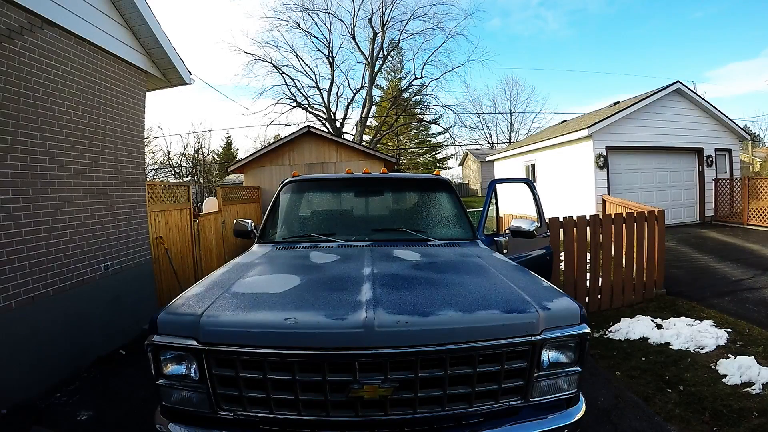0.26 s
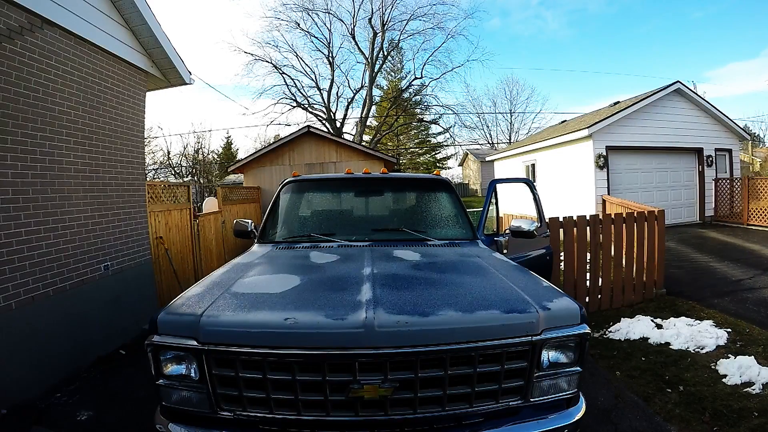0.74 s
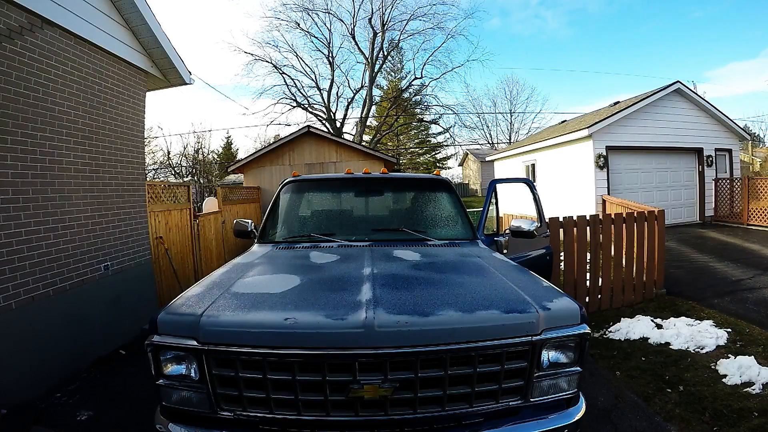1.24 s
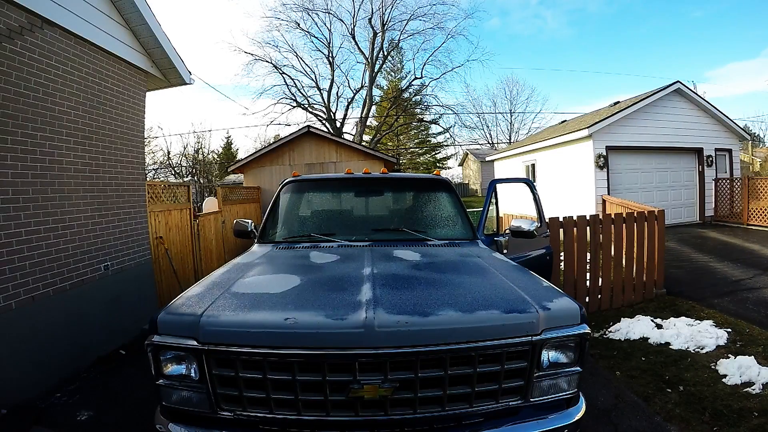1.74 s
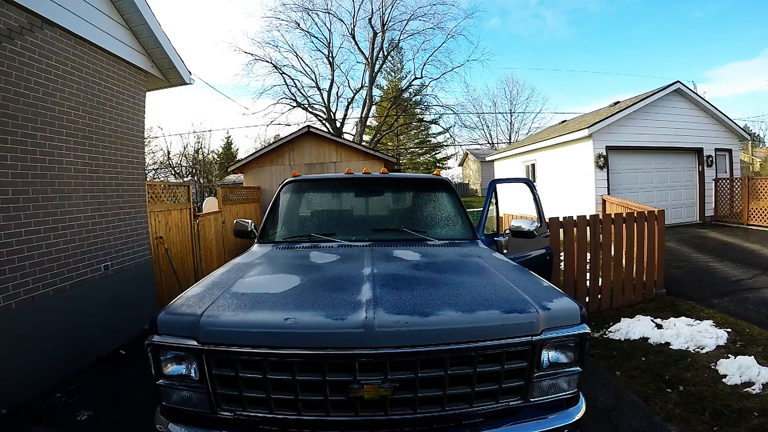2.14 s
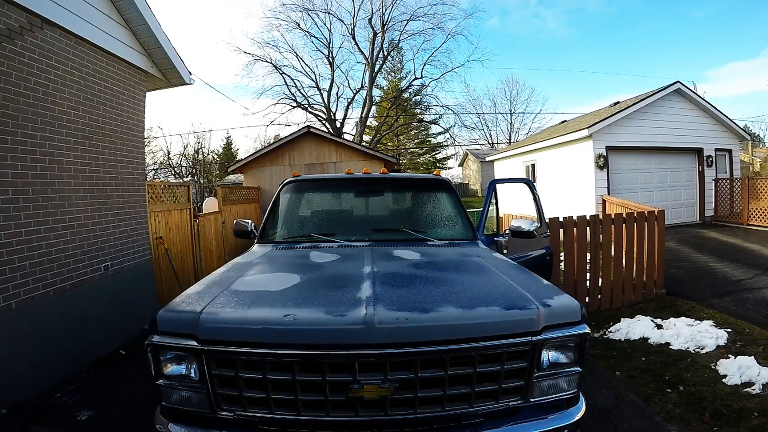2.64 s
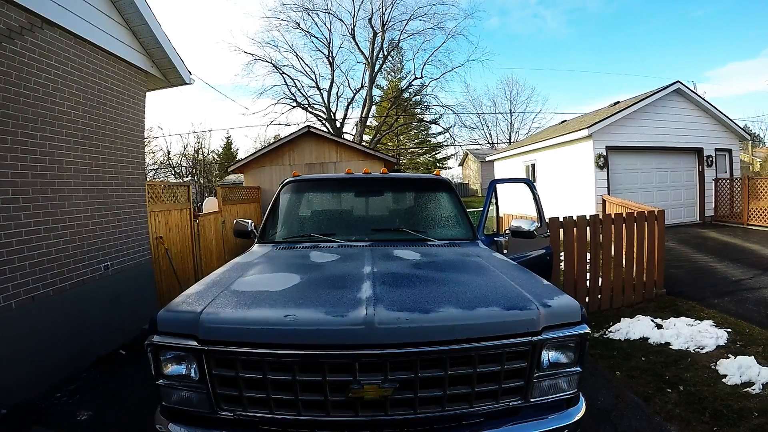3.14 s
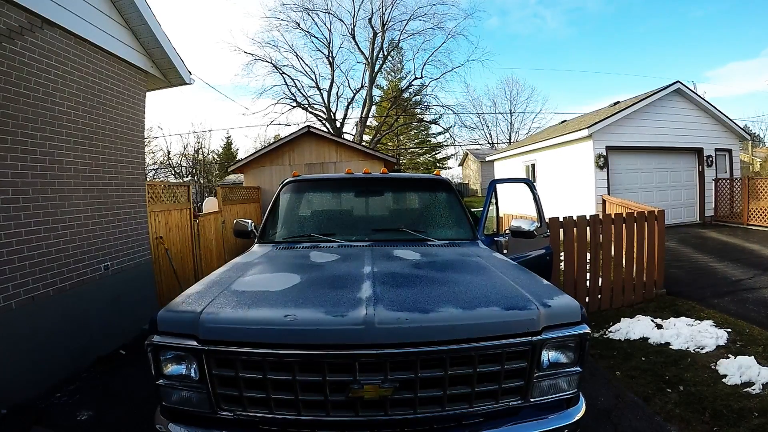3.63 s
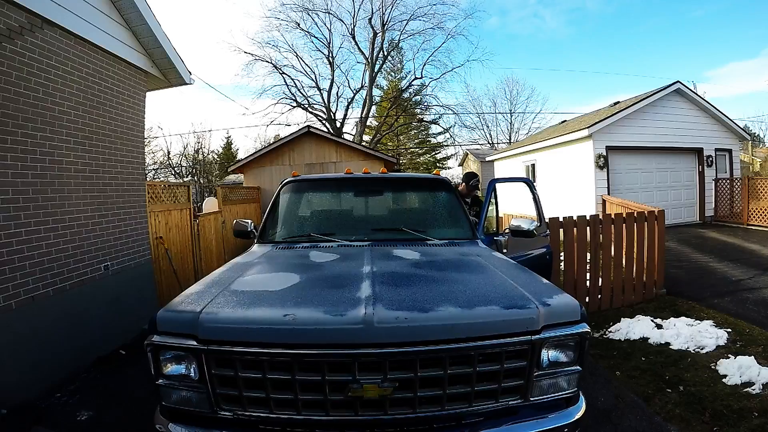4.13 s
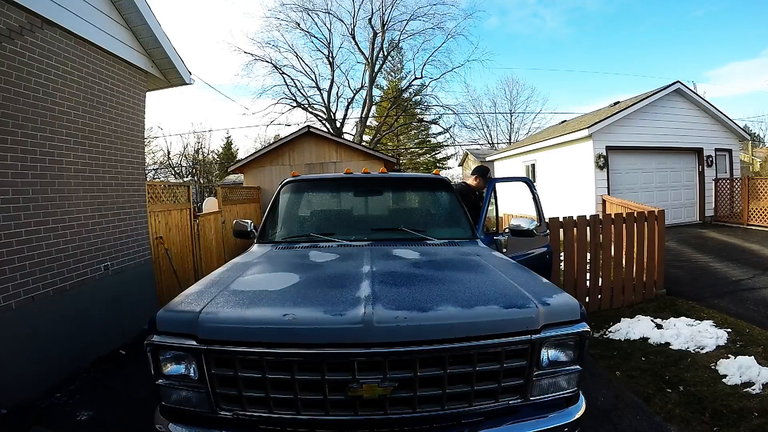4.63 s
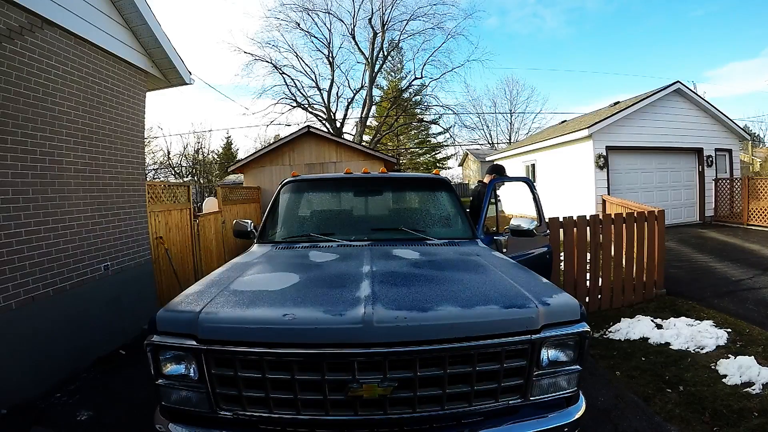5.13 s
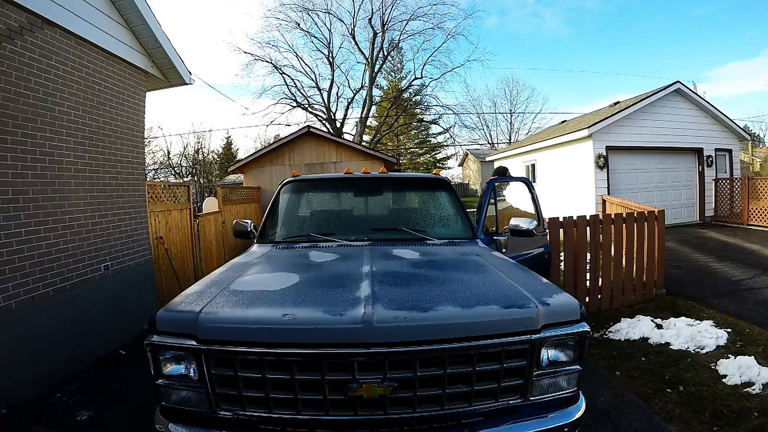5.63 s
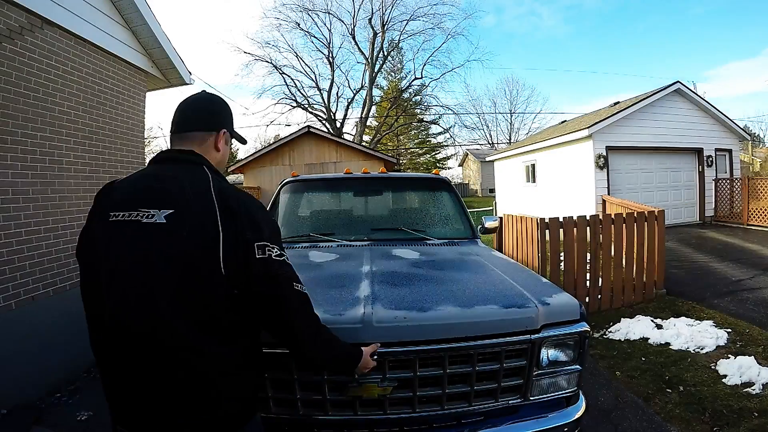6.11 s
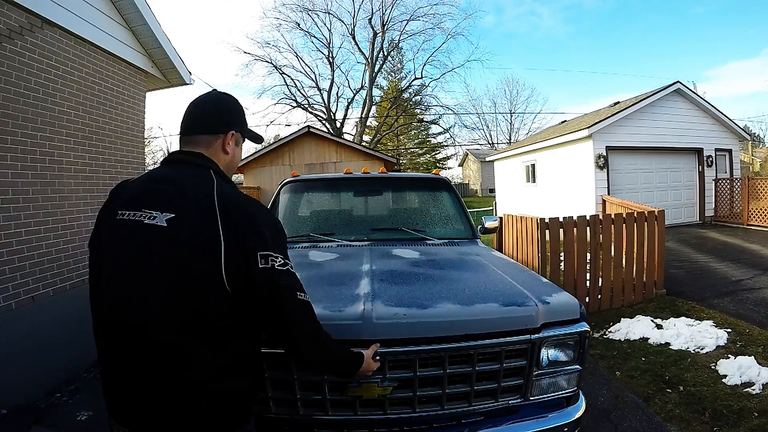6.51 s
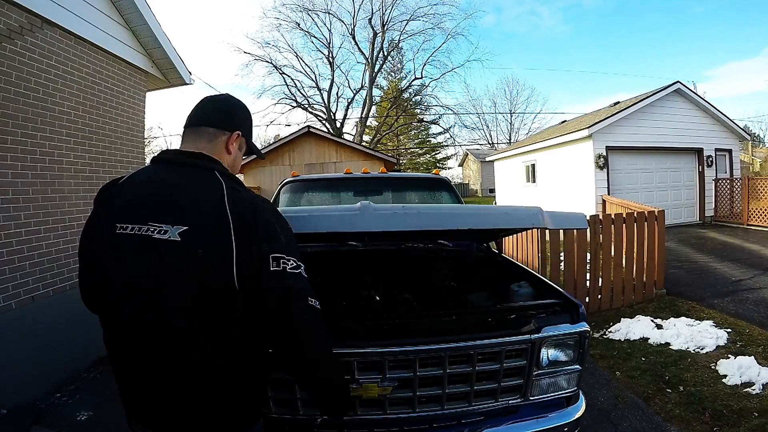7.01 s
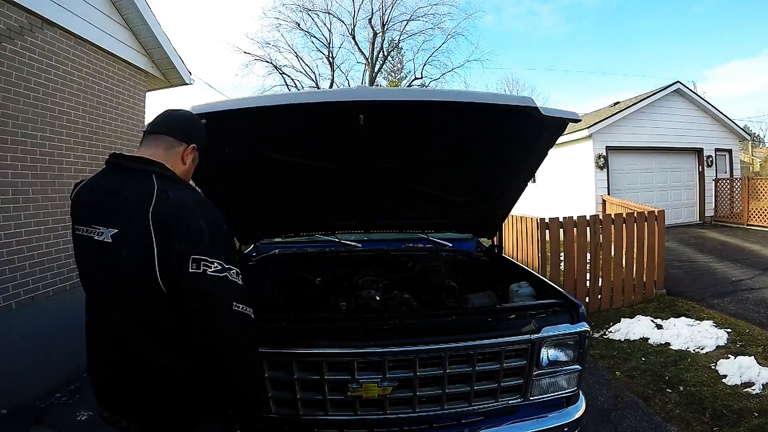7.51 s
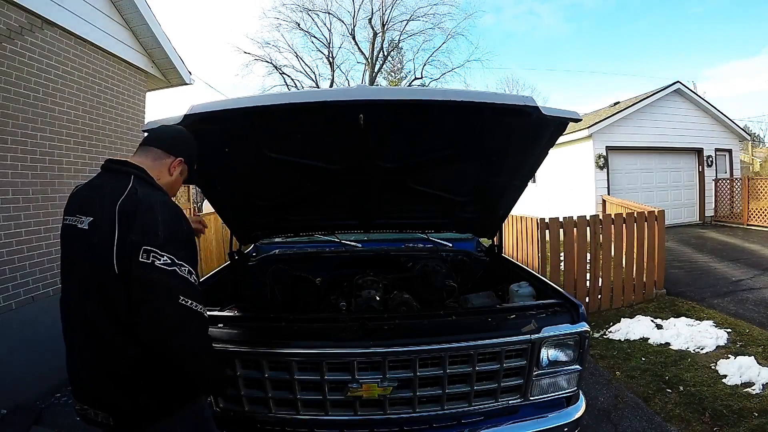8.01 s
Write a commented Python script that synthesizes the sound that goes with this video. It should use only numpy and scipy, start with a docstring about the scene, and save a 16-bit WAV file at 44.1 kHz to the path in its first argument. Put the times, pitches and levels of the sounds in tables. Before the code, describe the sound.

Quiet yard with distant traffic and light low wind. Weight shifts and dull knocks come from inside a parked pickup, then the released hood bangs loudly and bounces with a short metallic rattle. Softer cab bumps follow. Later the safety catch is fiddled with and clanks free in a hard, rapid cluster, with jacket rustle and a faint panel hum as the hood swings up. Fixed microphone in front of the truck, slight echo from walls.

```python
"""Far traffic and light wind, then weight shifting and dull knocks in the cab of a parked pickup.
The release is pulled: the hood bangs up and bounces. Later the safety catch clanks free, a jacket
rustles and the hood panel hums as it swings up. Metal is noise bursts through panel resonances, with
thin sine rings and a walled yard's echo; cloth, hum, traffic and wind are coloured, patchy noise."""
import sys
import numpy as np
from scipy import signal
from scipy.io import wavfile
from scipy.ndimage import uniform_filter1d

SR = 44100
rng = np.random.default_rng(int(sys.argv[2]) if len(sys.argv) > 2 else 0)


def transcribe(signal):
    """Save signal, clipped to [-1, 1], as a 16-bit WAV file at the path in sys.argv[1]."""
    frames = np.atleast_2d(signal).T
    limited = np.clip(frames, -1, 1)
    pcm = np.round(limited * 32767).astype(np.int16)
    wavfile.write(sys.argv[1], SR, pcm)


def linear_from_db(decibels):
    """Turn decibels (scalar or array-like) into linear amplitude factors; 0 gives 1."""
    return 10 ** (np.asarray(decibels, float) / 20)


N = 364266


def read(points, hz):
    """Value of a table on a log-frequency axis."""
    f, value = np.transpose(points)
    return np.interp(np.log(hz + 1), np.log(f + 1), value)


def evened(x):
    """Scales to rms 1."""
    return x / np.sqrt(np.mean(x ** 2) + 1e-20)


# where bass gives way to middle, treble and top: [f/Hz]
BAND_EDGES_HZ = (500, 2500, 7500)


def body(colour, modes):
    """A panel's causal responses in bass, middle, treble and top: resonances raised above a colour."""
    hz = np.fft.rfftfreq(32768, 1 / SR)
    peaks = sum(linear_from_db(db) ** 2 / (1 + (2 * (hz - f) / width) ** 2) for f, width, db in modes)
    gain = linear_from_db(read(colour, hz)) * np.sqrt(1 + peaks)
    lowpasses = [1 / (1 + (hz / edge) ** 4) for edge in BAND_EDGES_HZ]
    under = np.array([0 * hz] + lowpasses + [1 + 0 * hz])
    band_power = np.diff(under, axis=0)
    logs = np.log(gain * np.sqrt(band_power) + 1e-5)
    # minimum phase, so that the response never runs ahead of what drives it
    circle = np.concatenate([logs, logs[:, -2:0:-1]], 1)
    taps = np.fft.ifft(np.exp(np.conj(signal.hilbert(circle)))).real[:, :16384]
    norms = np.linalg.norm(taps, axis=1, keepdims=True)
    return taps / norms[[0, 1, 2, 2]]  # the top keeps its level against the treble


# decay time in bass, middle, treble and top, as a multiple of the blow's t60: [factor]
RING_FACTOR = (1.21, 1.144, 0.7, 0.77)
# first contact over the chatter in bass, middle, treble and top, before strike_db: [level/dB]
STRIKE_DB = (27.8, 17.6, 8.3, 3.3)


def struck(blows, taps, rise_s, chatter_db, crest_db, harder, linger, strike_db):
    """Blows are a strike and a chatter of contacts that swells, lingers and dies; hard ones reach higher."""
    shake, strikes = np.zeros((2, 4, N))
    flutter = evened(uniform_filter1d(rng.standard_normal((4, N)), 90))
    t = np.arange(SR) / SR
    swell = np.clip((t + 1 / SR) / max(rise_s, 1e-4), 0, 1) ** 2
    for s, db, bass_db, treble_db, t60 in blows:
        start = round(s * SR)
        top_db = treble_db + harder * (db + 2.0)
        for band, rel_db in enumerate((bass_db, 0, treble_db, top_db)):
            level_db = db + rel_db + crest_db
            strikes[band, start + round(rise_s * SR)] += linear_from_db(level_db + STRIKE_DB[band] + strike_db)
            age = np.maximum(t - rise_s, 0) / max(t60 * RING_FACTOR[band], .01)
            envelope = swell * linear_from_db(level_db - 60 * age ** linger)
            shake[band, start:start + SR] += (envelope ** 2)[:N - start]
    chatter = np.sqrt(shake) * linear_from_db(chatter_db * flutter) * rng.standard_normal(N)
    return signal.oaconvolve(chatter + strikes, taps, axes=1)[:, :N].sum(0)


# hood blows, before crest_db and RING_FACTOR:
# [t/s, middle level/dB, bass level/dB and treble level/dB against the middle, t60/s]
HOOD_BLOWS = [(2.141, -43.5, 0, -12, 0.14), (2.361, -41, -21, -11, 0.39), (2.379, -35.5, -9, -5, 0.1),
              (2.557, -7, 1.5, 1, .14), (2.591, -11, 1.5, -6.5, .35), (2.622, -16, 2, 4, 0.13),
              (2.695, -20, -3.5, -9, 0.1), (2.745, -25, 0.5, -1.5, 0.15), (2.816, -41.5, 18, -12, 0.24),
              (2.845, -31, 0.5, -17, .11), (2.880, -28.5, 2, -5.5, .17), (3.048, -42, -4, -19, .24),
              (3.096, -34.5, -2.5, -15, 0.23)]
# a brief treble swell just ahead of the bang: [columns as HOOD_BLOWS]
TREBLE_SWELL = [(2.530, -28.5, -11, 10, .1)]
# overall colour of the hood: [f/Hz, level/dB]
HOOD_COLOUR = [(76, -28), (130, -10), (170, -8.5), (220, -0.5), (600, -11), (780, -14.5), (1430, -12.5),
               (2340, -20.5), (3920, -21.5), (5100, -25.5), (6000, -21.5), (8500, -44), (11500, -58.5),
               (13300, -59), (15000, -65)]
# hood resonances: [f/Hz, width/Hz, level/dB above the colour]
HOOD_MODES = [(191, 26, 4.7), (224.5, 11, 4.7), (261, 20, 9.6), (335.4, 30, 7.3), (426, 44, 9.1),
              (501, 18, 5.6), (692, 28, 3.53), (946, 37, 2.8), (1120, 19, 2.9), (1243, 23, 2),
              (1405, 30, 5.6), (1467, 28, 4.5), (2096, 95, 8), (2760, 41, 3.8), (3180, 22, 2.6),
              (3520, 85, 9.9), (3620, 72, 4), (4005, 110, 9), (4410, 73, 4.6), (5720, 50, 5),
              (5780, 47, 4.3), (6100, 80, 5.2), (6600, 54, 4.4)]


def hood():
    """Sheet metal: the hood bangs up and bounces; the treble swells briefly just ahead of the bang."""
    panel = body(HOOD_COLOUR, HOOD_MODES)
    bangs = struck(HOOD_BLOWS, panel, rise_s=.003, chatter_db=2.43, crest_db=-4.0,
                   harder=0.12, linger=1.246, strike_db=-1.5)
    treble_swell = struck(TREBLE_SWELL, panel, rise_s=.027, chatter_db=2.2, crest_db=-3.5,
                          harder=0.1, linger=1.21, strike_db=-17)
    return bangs + treble_swell


# safety catch worked until it clanks free: [columns as HOOD_BLOWS]
CATCH_BLOWS = [(6.098, -39, 3.5, -3, .29), (6.256, -26.5, 0.5, -9.5, .16), (6.286, -33, 6, -11, 0.1),
               (6.494, -24, -7, -1.5, 0.25), (6.601, -30, -2.5, 0.8, 0.5), (6.672, -4, -3, -3, .22),
               (6.701, -10, 5.5, -18, 0.093), (6.735, -20, 8.5, 0.5, 0.34), (6.768, -7.5, -9, -0.5, .17),
               (6.802, -14.5, 5, -1, .17), (6.836, -29, 6, -9, .15), (6.860, -18, -0.5, -5, .15),
               (6.895, -42, 16, -10, 0.072), (6.977, -47.5, 11, -2, 0.16), (7.070, -41, 4, -0.5, 0.19),
               (7.327, -40.5, 11.5, -29, 0.044), (7.443, -37.5, 4.5, -8, .05),
               (8.137, -36.5, -8, -11, 0.11), (8.175, -42.5, -1.5, -7, .19)]
# the hook drags along the loop: [columns as HOOD_BLOWS]
CATCH_SLIDES = [(6.350, -41.5, 4, -10, 0.23), (6.646, -17, -7, 2.5, 0.19)]
# overall colour of the catch: [f/Hz, level/dB]
CATCH_COLOUR = [(76, -45), (130, -8.5), (200, -5.5), (454, 3), (600, 1), (777, -5), (1380, -5), (2270, -10),
                (3810, -16.5), (5030, -21), (5900, -20), (7630, -31), (10500, -41), (12800, -45),
                (15000, -51)]
# catch resonances: [f/Hz, width/Hz, level/dB above the colour]
CATCH_MODES = [(188, 26, 5.3), (224, 21, 4.8), (290, 27, 7.6), (391.5, 11, 6.1), (443.4, 2.2, 6.6),
               (460, 27, 2.9), (640, 59, 2.4), (750, 18, 2.8), (924, 82, 1.8), (1090, 27, 5.2),
               (1200, 75, 4.3), (1450, 52, 4.4), (1606, 55, 2.1), (1980, 100, 2.5), (2480, 61, 3.1),
               (3030, 29, 2.2), (3580, 39, 3.5), (3860, 76, 5.6), (4350, 90, 4.5), (5020, 46, 3.9),
               (5840, 43, 5.2), (12600, 240, 4.2)]


def catch():
    """Hook and loop: sharp clanks, and drags with a slower rise and a weaker first contact."""
    metal = body(CATCH_COLOUR, CATCH_MODES)
    clanks = struck(CATCH_BLOWS, metal, rise_s=0.00249, chatter_db=1.62, crest_db=-7,
                    harder=0.34, linger=1.254, strike_db=-5)
    drags = struck(CATCH_SLIDES, metal, rise_s=0.017, chatter_db=1.5, crest_db=-6,
                   harder=0.17, linger=1.2, strike_db=-15)
    return clanks + drags


# small parts left ringing: [t/s, f/Hz, level/dB, t60/s]
RINGS = [(2.891, 2702, -29.5, 0.079), (2.905, 1775, -39.5, 0.39), (2.884, 1300, -53, 0.13),
         (6.499, 4300, -34.5, 0.1), (6.495, 2619, -35, 0.15), (6.495, 2393, -38.5, 0.29),
         (6.495, 1396, -37, 0.25), (6.495, 1547, -32.5, 0.16), (6.497, 2800, -39, 0.17),
         (7.327, 790, -40, 0.078), (6.5, 340, -39, 0.17), (6.9, 1110, -48, 0.27), (6.26, 1150, -38.5, 0.2),
         (6.257, 4600, -53, .15), (1.25, 1590, -42.5, 0.076)]


def rings():
    """Thin dying tones of a spring and of loose brackets."""
    t, out = np.arange(N) / SR, np.zeros(N)
    for s, hz, db, t60 in RINGS:
        age = np.maximum(t - s, 0)
        onset = 1 - np.exp(-age / 0.0016)
        out += linear_from_db(db - 60 * age / t60) * onset * np.sin(2 * np.pi * hz * age)
    return out


# overall colour of the cab: [f/Hz, level/dB]
CAB_COLOUR = [(76, -46.5), (130, -18), (176, -2), (319, -3), (626, -17), (771, -18), (835, -22),
              (2120, -37), (6000, -42), (7800, -86), (13200, -120)]
# cab resonances: [f/Hz, width/Hz, level/dB above the colour]
CAB_MODES = [(156.6, 18, 6.8), (195.3, 15, 4.6), (240.4, 9, 4.7), (293, 28, 3), (460, 60, 5.1),
             (562, 50, 7.5), (676, 25, 7.4), (1417, 85, 3.2), (1584, 57, 8.3), (2460, 300, 2.9),
             (3420, 250, 1.6)]


def cab_body():
    """The cab's dull response, which colours both knocks and shifting weight."""
    return body(CAB_COLOUR, CAB_MODES)


# dull knocks in the cab: [columns as HOOD_BLOWS]
CAB_KNOCKS = [(0.937, -38, -6, -26, 0.14), (1.099, -46.5, 11.5, -19, 0.14), (1.247, -30.5, -1.5, -32, .11),
              (1.342, -32, -3, -28, 0.22), (3.96, -40.5, 9, -12, 0.28), (4.434, -31, 6, -22, 0.25),
              (4.49, -40, -3, -19, .15), (4.55, -53, 6.5, -9, .14), (4.813, -52.5, 13, -10, 0.16),
              (5.148, -34.5, -5, -31, 0.1), (5.548, -40.5, 5.5, -14, .099), (5.646, -43, -3, -9.5, 0.16),
              (5.808, -35.5, 2.5, -20, .074)]


def cab_knocks(cab):
    """Dull blows, weak in treble, through the cab's resonances."""
    return struck(CAB_KNOCKS, cab, rise_s=0.00408, chatter_db=1.4, crest_db=-6,
                  harder=.1, linger=1.16, strike_db=-0.3)


# yard decay: [f/Hz, t60/s]
YARD = [(150, 0.91), (600, 0.81), (2500, 0.39), (6000, 0.33), (9500, 0.81), (14000, 0.23)]


def yard(x):
    """Walls and fences: sparse taps of random sign, each band dying at its own speed."""
    taps = np.zeros(SR)
    at = np.arange(400, SR - 20, 20)
    taps[at + rng.integers(0, 20, len(at))] = rng.choice([-1., 1.], len(at))
    hz, t, z = signal.stft(taps, SR, nperseg=256)
    decay = linear_from_db(-60 * t / read(YARD, hz)[:, None])
    tail = signal.istft(z * decay, SR, nperseg=256)[1]
    return signal.fftconvolve(x, tail / np.linalg.norm(tail))[:N]


def swells(rows, floor_db):
    """Gain of sounds that climb to a peak and die away, summed in power over a steady floor."""
    t, power = np.arange(N) / SR, linear_from_db(floor_db) ** 2
    for s, db, rise, t60 in rows:
        climb = 25 * (s - t) / max(rise, .002)  # 25 dB up within the rise time
        fall = 60 * (t - s) / max(t60, .02)
        power = power + linear_from_db(db - np.maximum(climb, fall)) ** 2
    return np.sqrt(power)


def noise(colour, patchy_db):
    """Coloured noise from random short-time spectra with drifting patches, at rms 1."""
    hz = np.fft.rfftfreq(2048, 1 / SR)
    shape = len(hz), N // 512 + 5
    real, imaginary = rng.standard_normal((2, *shape))
    across_hz = uniform_filter1d(rng.standard_normal(shape), 16, 0)
    patches = evened(uniform_filter1d(across_hz, 6, 1))
    z = (real + 1j * imaginary) * linear_from_db(read(colour, hz)[:, None] + patchy_db * patches)
    return evened(signal.istft(z, nperseg=2048, noverlap=1536)[1][:N])


# weight moving on seat, floor and ground: [peak t/s, level/dB, rise/s, t60/s]
SHIFTING = [(.33, -53, .03, 1.4), (.94, -49, 0.074, 3), (1.26, -45, .04, 0.33), (1.34, -40.5, 0.13, .8),
            (2.15, -44.5, 0.089, 1.7), (2.5, -42.5, 0.34, 0.56), (3.17, -43, 0.043, 3),
            (3.78, -41.5, .06, 1.5), (4.44, -34, 0.016, 0.5), (4.81, -53, .02, 3.7),
            (5.18, -44.5, 0.24, 0.091), (5.6, -45, 0.25, .1), (5.66, -43, .05, .5),
            (5.81, -39.5, 0.055, 0.54), (7.24, -47, .15, 4.5), (7.89, -52, .25, 0.35),
            (8.035, -46, .02, 0.23), (8.17, -45.5, 0.045, .9)]


def shifting_weight(cab):
    """Creaky noise through the cab's bass and middle, over small movements that never stop."""
    creak_db = 3.3 * evened(uniform_filter1d(rng.standard_normal(N), 700))
    creaks = linear_from_db(creak_db) * rng.standard_normal(N)
    dull = evened(signal.oaconvolve(creaks, cab[0] + 0.46 * cab[1])[:N])
    return swells(SHIFTING, floor_db=-58) * dull


# swing of the hood panel: [peak t/s, level/dB, rise/s, t60/s]
HUM = [(6.95, -48.5, .03, 2.9)]
# hum colour: [f/Hz, level/dB per Hz]
HUM_COLOUR = [(400, -55), (445, -7), (460, 0), (478, -2), (530, -48)]


def hood_hum():
    """The hood panel hums in a narrow band as it swings up."""
    return swells(HUM, -np.inf) * noise(HUM_COLOUR, 1.6)


# jacket movements: [peak t/s, level/dB, rise/s, t60/s]
RUSTLE = [(5.104, -58, .08, .4), (5.162, -57, .05, .25), (6.104, -47.5, .015, 0.76), (6.26, -60, .04, .6),
          (6.47, -56.5, 0.24, 0.37), (6.91, -51, .02, 1.1), (7.12, -54.5, .015, .6),
          (7.414, -55.5, 0.96, 2.7), (7.8, -54.5, 0.23, 1.1), (7.914, -57, .06, 6)]
# cloth colour: [f/Hz, level/dB per Hz]
RUSTLE_COLOUR = [(900, -1.5), (2000, -6), (3500, -4.5), (6000, -3.5), (7500, -21), (11000, -25)]


def jacket():
    """Cloth rubbing: patchy noise that swells with each movement."""
    return swells(RUSTLE, -np.inf) * noise(RUSTLE_COLOUR, 2.5)


# far traffic colour: [f/Hz, level/dB per Hz]
TRAFFIC_COLOUR = [(53, -58), (90, -14), (112, -30), (130, -1), (158, 0), (253, -10), (328, -13), (398, -11),
                  (494, -15.5), (640, -17), (1420, -22.5), (1550, -24.5), (5290, -33), (9890, -34.5),
                  (15600, -46.5)]


def far_traffic():
    """A steady bed of bass-heavy, slightly patchy noise."""
    return linear_from_db(-49.5) * noise(TRAFFIC_COLOUR, 1.15)


# gusts at the microphone, before the lumps: [peak t/s, level/dB, rise/s, t60/s]
WIND = [(.11, -56.5, .3, 5.4), (2.85, -46.5, 0.32, 5.3), (3.3, -45, 0.56, 2), (4.1, -55.5, .9, 2),
        (5.6, -68, 1.5, 4), (7.84, -68, 0.53, 2.2)]
# wind colour: [f/Hz, level/dB per Hz]
WIND_COLOUR = [(5.9, -36), (10, -5), (48, 2.5), (59, -5), (86, -6), (110, -6.5), (140, -49), (240, -120)]


def wind():
    """Low rumble of gusts over a calm floor, made lumpy by a slow random level."""
    span = round(.07 * SR)
    drift = uniform_filter1d(uniform_filter1d(rng.standard_normal(N), span), span)
    lumps = linear_from_db(2.2 * evened(drift))
    return swells(WIND, floor_db=-71.5) * lumps * noise(WIND_COLOUR, 1.8)


# how far the channels part, before the lean: [f/Hz, side level/dB against mid]
SIDE_DB = [(3000, -49.5), (9000, -15), (11500, -33), (11900, 0.5), (15000, -2)]


def spread(mid, lean):
    """Channels alike but for the topmost treble, which is unrelated between them and favours the right."""
    hz, _, z = signal.stft(mid, SR, nperseg=256)
    scatter = np.exp(2j * np.pi * rng.random(z.shape))
    side_z = z * linear_from_db(read(SIDE_DB, hz))[:, None] * (scatter - lean)
    side = signal.istft(side_z, SR, nperseg=256)[1][:N]
    return np.array([mid + side, mid - side])


def scene():
    """Metal, cab and cloth over traffic; the wind is felt at the microphone itself."""
    cab = cab_body()
    metal = hood() + catch() + cab_knocks(cab) + rings()
    echo = linear_from_db(-13.5) * yard(metal)
    sources = metal + echo + shifting_weight(cab) + hood_hum() + jacket() + far_traffic()
    # steep bass cut of the microphone, which the wind escapes
    bass_cut = signal.cheby2(8, 45, 108, "high", fs=SR, output="sos")
    return spread(signal.sosfilt(bass_cut, sources) + wind(), lean=0.2)


def low_pass(x):
    """Removes everything above the highest recorded frequency."""
    return signal.sosfilt(signal.butter(12, 15710, fs=SR, output="sos"), x)


def record(dry):
    """Soft overload rounds the loudest peaks, then the band is limited to about 15 kHz."""
    overloaded = np.tanh(dry / 1.587) * 1.61
    band_limit = signal.firwin(511, 15300, window=("kaiser", 9), fs=SR)[None]
    return low_pass(signal.oaconvolve(overloaded, band_limit, "same"))


dry = scene()
out = record(dry)
transcribe(out)
```